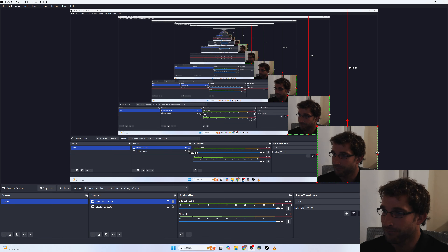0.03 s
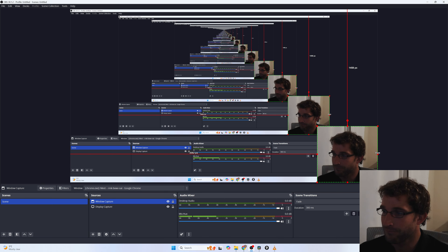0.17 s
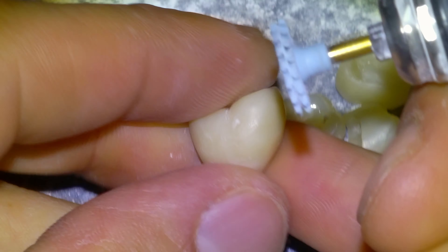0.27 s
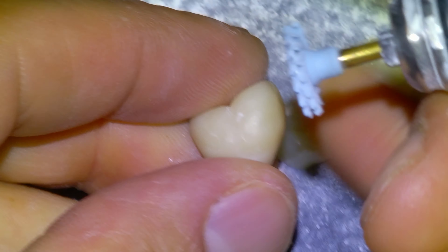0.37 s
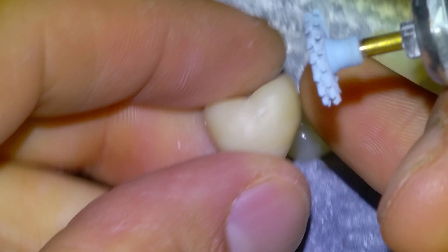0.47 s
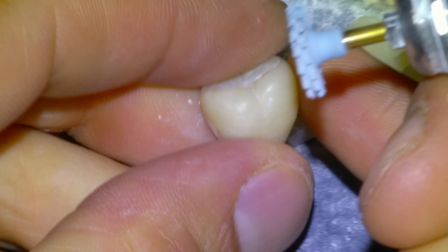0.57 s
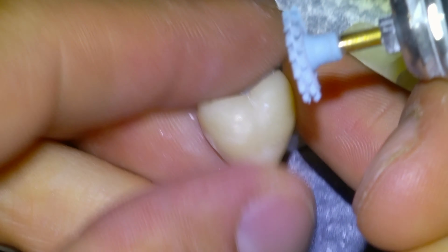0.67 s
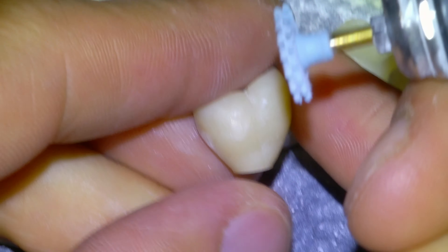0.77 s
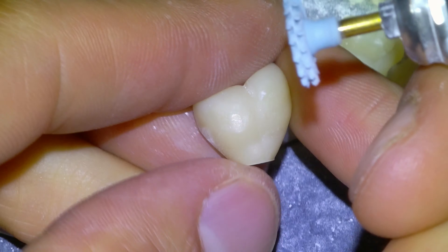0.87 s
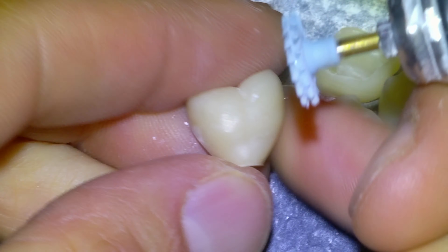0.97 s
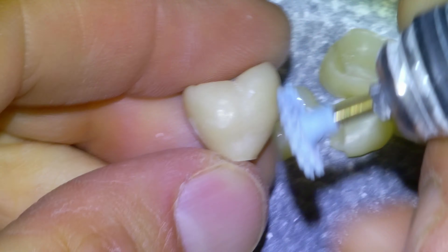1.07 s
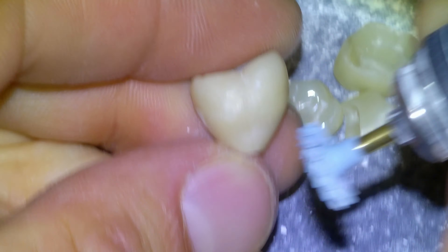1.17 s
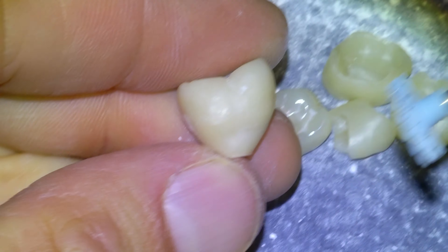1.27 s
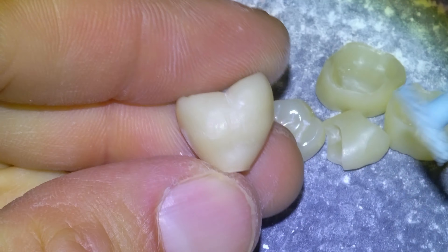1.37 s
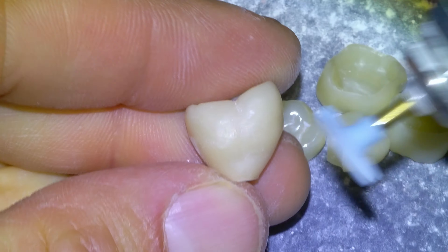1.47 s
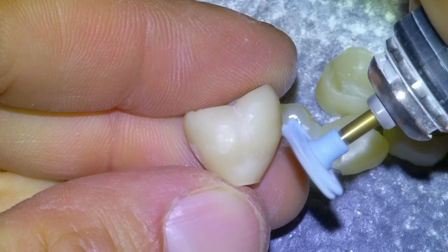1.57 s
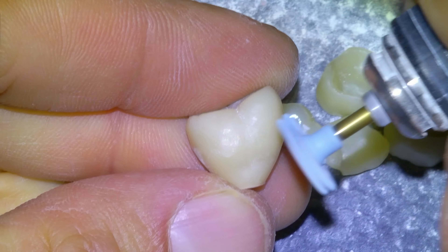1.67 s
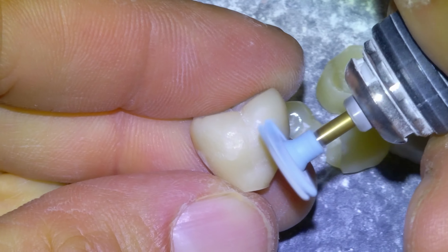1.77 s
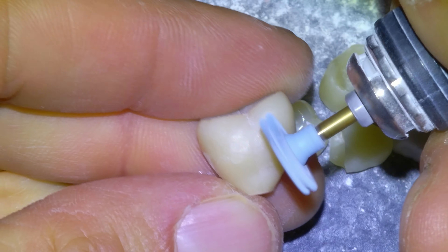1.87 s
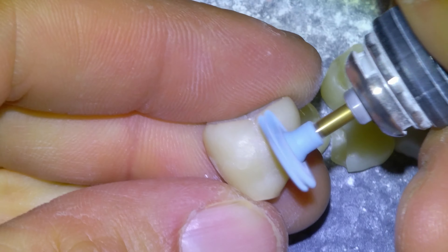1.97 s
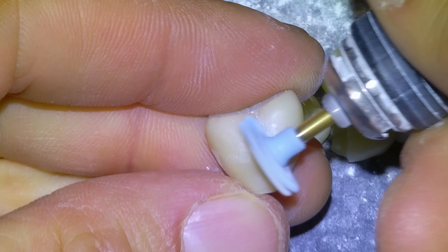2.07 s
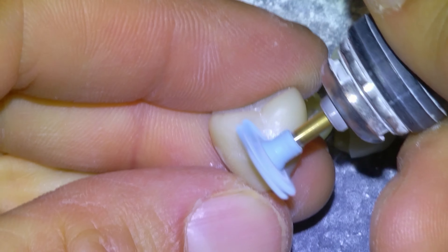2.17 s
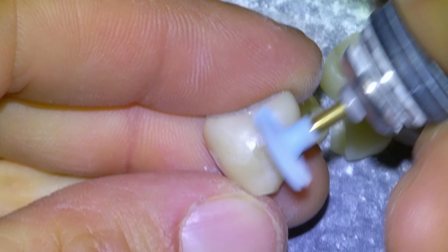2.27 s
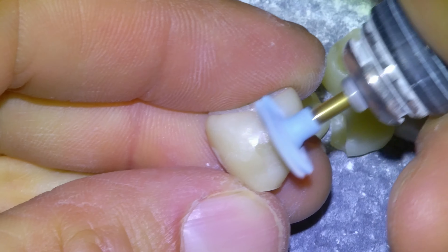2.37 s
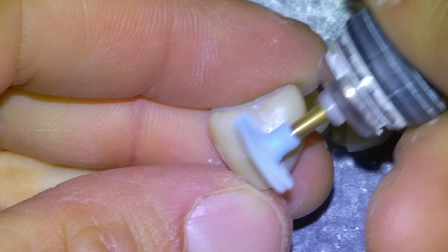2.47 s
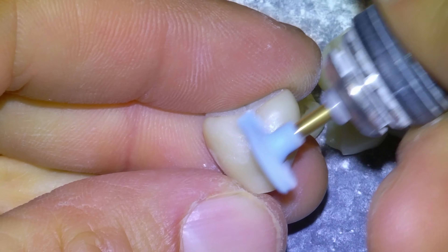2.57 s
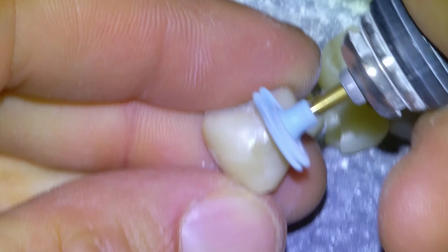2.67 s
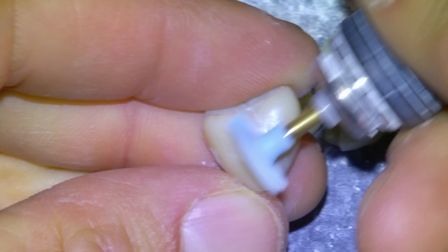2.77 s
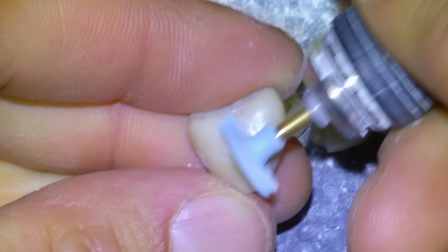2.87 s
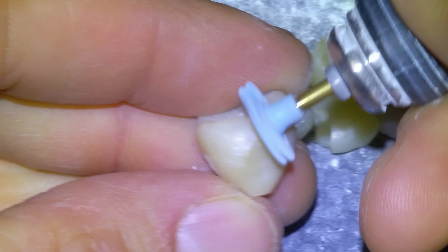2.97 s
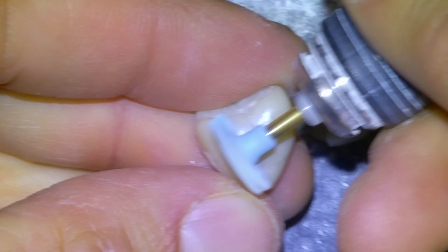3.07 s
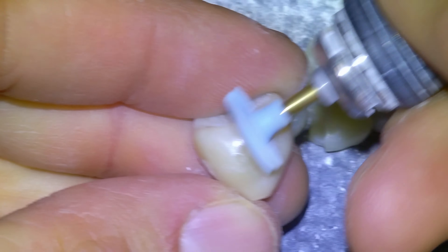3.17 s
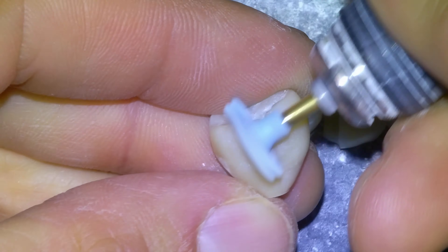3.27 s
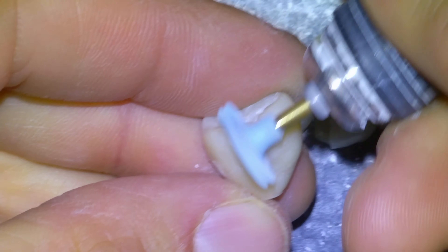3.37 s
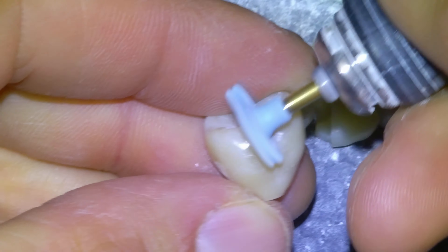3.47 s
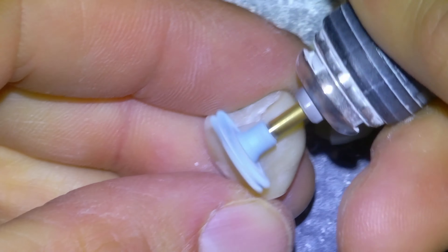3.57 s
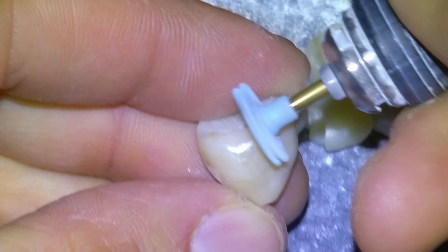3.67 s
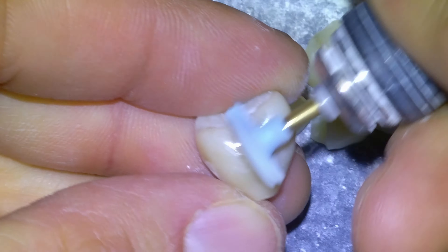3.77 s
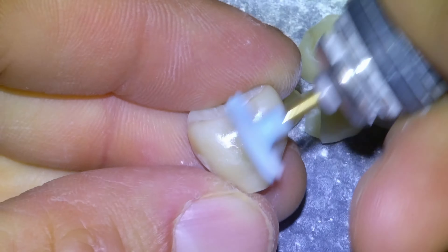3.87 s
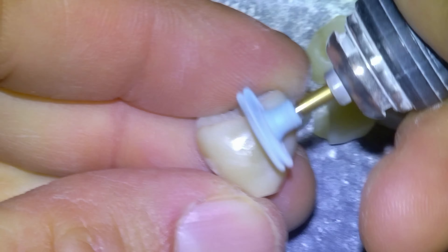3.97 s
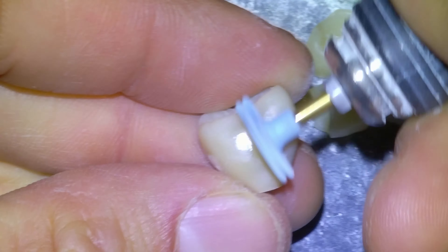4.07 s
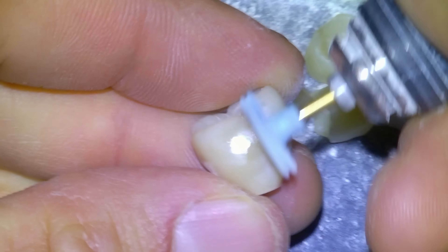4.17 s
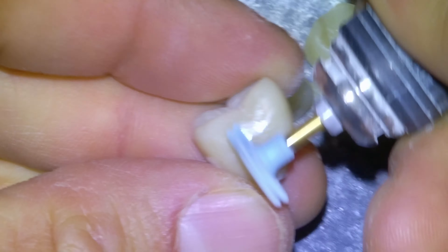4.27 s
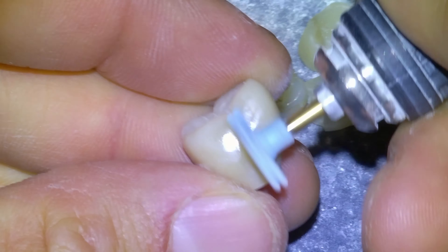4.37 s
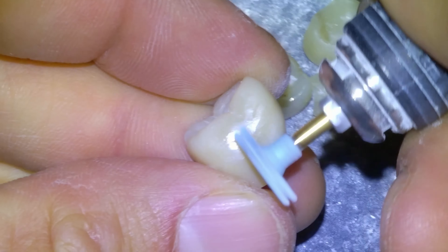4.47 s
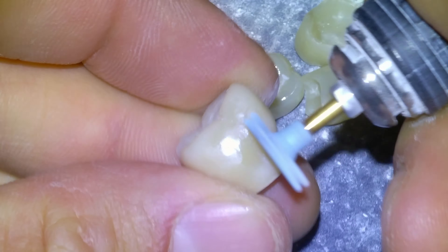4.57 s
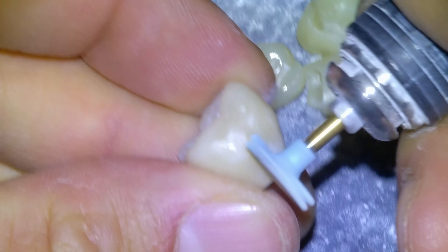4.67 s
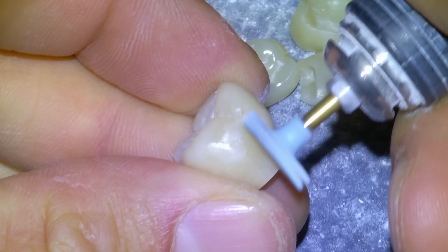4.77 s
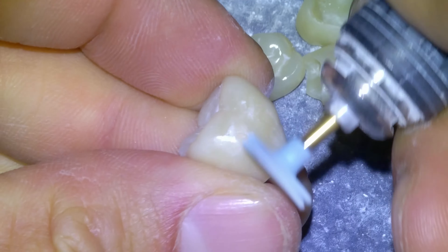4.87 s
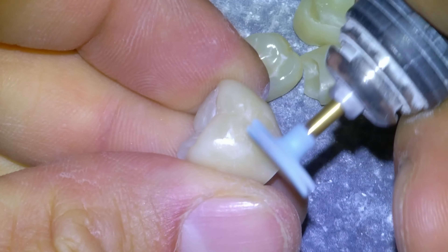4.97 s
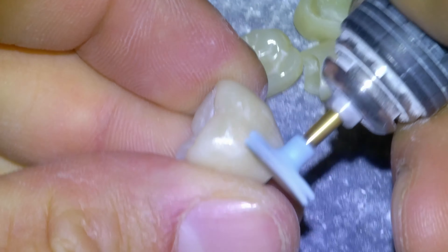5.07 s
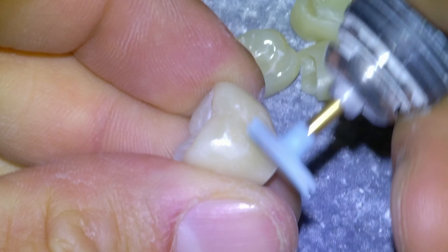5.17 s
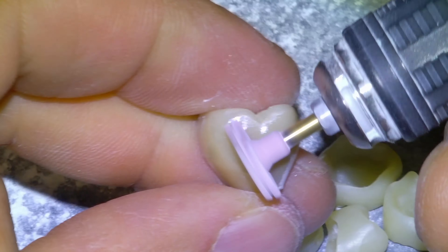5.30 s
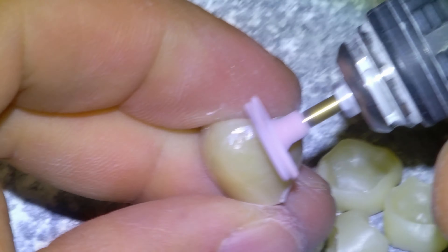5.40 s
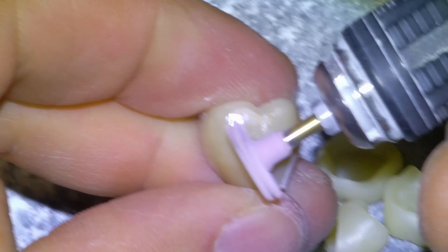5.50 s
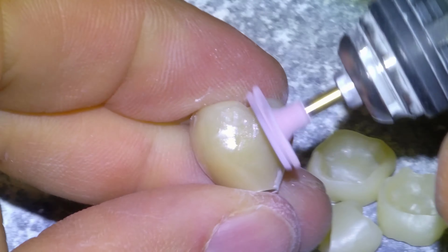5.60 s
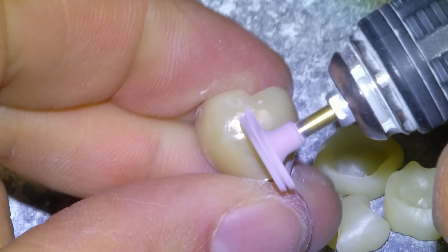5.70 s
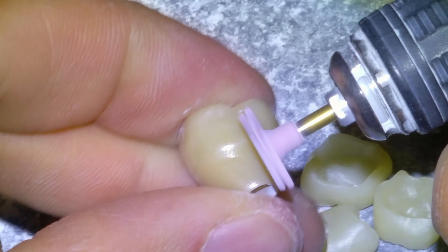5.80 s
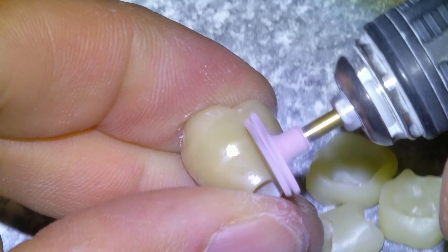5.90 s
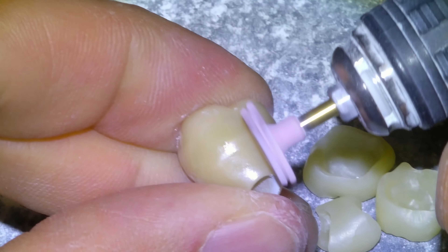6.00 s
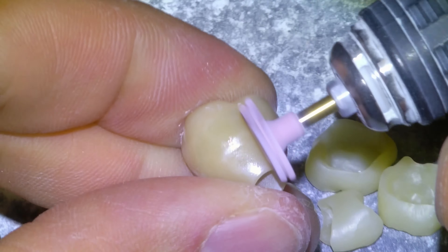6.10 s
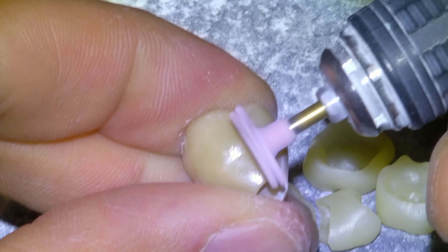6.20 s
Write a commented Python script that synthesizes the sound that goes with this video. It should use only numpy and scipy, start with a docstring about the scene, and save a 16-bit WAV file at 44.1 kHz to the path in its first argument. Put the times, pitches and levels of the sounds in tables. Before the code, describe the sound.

A dull low rumble lasts until 0.19 s and stops abruptly. Very quiet room noise follows, with tiny dry ticks near 0.36 and 0.96 s and a soft rustle of the gripping hand around 1.25 s. A low hum swells. At 1.34 s a tight double clack switches on a small dental micromotor; from 1.4 s it whirrs, shudders around 1.6 s and sweeps steeply upward with a rough squeal and shrieking bearing overtones, reaching speed by about 2 s. A piercing high whine, around six to seven kilohertz, then holds, wavering slightly in pitch and swelling unevenly as the wheel presses the crown, over mid-pitched rattle and airy hiss. Room hum fades by 2.9 s; thin whistles come and go and the brightness gradually dulls. At 5.3 s a finer wheel enters with a short scrape, then rubs more softly. The motor is still running when it ends around 6.2 s. Close and dry.

```python
"""Dental lab, one microphone close by; a faint workshop hum behind. It opens with a low rumble that cuts off;
after a short silence the scene changes to the lab. A micromotor is switched on with a knock, spins up to 600
turns/s and polishes a ceramic crown. Bearing tones locked to the shaft sweep through the handpiece resonances
and settle into a whine, over the rattle of shaft and rubber wheel (hits and noise through body modes) and
rolling hiss. Late on a finer wheel takes over with a short scrape and a softer rub."""
import sys
import numpy as np
from scipy import signal
from scipy.fft import rfft, irfft, next_fast_len
from scipy.io import wavfile
from scipy.ndimage import uniform_filter1d, map_coordinates

SR = 44100
rng = np.random.default_rng(int(sys.argv[2]) if len(sys.argv) > 2 else 0)


def inscribe(sig):
    """Save sig as 16-bit PCM at rate SR to the path in sys.argv[1].

    A 1-D sig is mono; a 2-D sig holds one channel per row.
    Samples are clipped to [-1, 1] before scaling.
    """
    pcm = np.round(np.clip(np.atleast_2d(sig).T, -1, 1) * 32767)
    wavfile.write(sys.argv[1], SR, pcm.astype(np.int16))


N = 275184
TIME = np.arange(N) / SR

# Workshop room noise level: t/s, level/dB
ROOM_LEVEL_DB = [(.235, -65.5), (.9, -64), (1.8, -52), (2.55, -53), (2.9, -78)]
# Room noise spectrum: f/Hz, relative density/dB
ROOM_SPECTRUM = [(50, -40), (80, -27), (105, -2), (200, -6.5), (350, 1), (600, -1), (1100, -2),
                 (1700, -2.5), (2300, -10), (2900, -17.5), (4500, -22.5), (8000, -21.5), (12000, -18.5),
                 (15500, -35)]
# Steady room tones: f/Hz, level over room noise/dB
ROOM_TONES = [(479, -10), (1367, -13), (1641, -5)]
# 320 Hz hum: t/s, level/dB
HUM_LEVEL_DB = [(.3, -87), (.52, -69), (.7, -76.5), (1.28, -55.5), (1.95, -48.5), (2.2, -52.5), (2.5, -53),
                (2.8, -84)]
# Opening rumble spectrum: f/Hz, relative density/dB
RUMBLE_SPECTRUM = [(12, -31), (20, -4), (97, -3.5), (217, -7), (387, -5.5), (940, -23), (1270, -20.5),
                   (1640, -24), (2100, -17.5), (3650, -31), (15000, -38)]
# Grip rustle spectrum: f/Hz, relative density/dB
RUSTLE_SPECTRUM = [(700, -30), (1800, -1), (3200, -4), (4600, -5), (5400, -22), (6500, -6), (9000, -36),
                   (14000, -45)]
# Small dry ticks: t/s, peak/dB
TICKS = [(0.364, -46), (0.963, -42)]
# Knocks of switch and handpiece: t/s, relative level/dB, ring time factor/1
KNOCKS = [(1.335, -32.5, 0.7), (1.342, -34.5, 0.78), (1.362, -44, 1.7)]
# Knock modes: f/Hz, relative level/dB, t60 before ring factor/s
KNOCK_MODES = [(555, 3, 0.17), (652, -8, 0.24), (1190, -9, 0.096), (1433, 5, 0.12), (1560, 14, 0.063),
               (2040, 12.5, 0.06), (2450, -18, 0.055), (4300, -1, 0.075), (7140, -12, .04)]
# Low shaft shudders: t/s, level/dB, Gaussian sigma/s, f/Hz
SHUDDERS = [(1.602, -40, .008, 690), (1.618, -37.5, 0.023, 580), (1.62, -38, 0.043, 1580),
            (2.415, -43.5, 0.061, 610), (2.625, -47, 0.07, 492)]
# Running speed, sagging and recovering under the hand: t/s, shaft speed/(turns/s)
RUNNING_SPEED = [(2.06, 598.4), (2.2, 604.3), (2.38, 605.5), (2.62, 598.9), (2.9, 596.6), (3.18, 596.8),
                 (3.5, 602.2), (3.67, 600.8), (3.85, 605.9), (4.15, 600.1), (4.66, 608.8), (5.02, 602.8),
                 (5.28, 599.8), (5.41, 591.3), (5.55, 599.8), (5.85, 608.2), (6.24, 608.8)]
# Sound radiated by the handpiece: f/Hz, gain/dB
HOUSING = [(250, -30), (600, -17), (1200, -13), (1800, -6), (2600, -14), (3700, -20), (5300, -20),
           (5900, -8), (6400, 0), (7400, -9), (9700, -10), (10500, -19), (11200, -27), (15500, -35)]
# Path from balls into housing: f/Hz, gain/dB
COUPLING = [(1500, -10), (3000, -5), (5000, -2), (8000, -1.5), (9500, -2.5), (10700, -7.5), (13000, -2),
            (15000, 1)]
# Rattle spectrum: f/Hz, relative density/dB
RATTLE_SPECTRUM = [(60, -80), (130, -35.5), (220, -25), (420, -24), (750, -13.5), (1180, -4.5),
                   (1600, -1.5), (2050, -1), (2400, -4), (3000, -8), (3700, -18), (5600, -23), (7300, -48)]
# Body resonances excited by the rattle: f/Hz, width/Hz, relative gain/dB
BODY_MODES = [(1777, 33, 2), (1895, 19, -0.5), (2040, 33, 0.5), (2186, 21, 1.5), (3170, 38, -22)]
# Bearing hiss spectrum: f/Hz, relative density/dB
HISS_SPECTRUM = [(3000, -25), (4500, -5.5), (5300, -11.5), (6000, 4), (6450, 2), (7100, -1), (8200, -2.5),
                 (9200, -8), (10200, -21), (11500, -33)]
# Fine rubbing hiss spectrum: f/Hz, relative density/dB
RUB_SPECTRUM = [(8000, -23), (10500, -4), (12000, -4.5), (14000, -6), (15700, -22)]
# Rotor tones: multiple of shaft rate/1, level before housing/dB
ROTOR = [(1, -31.5), (2, -34.5), (3, -37.5), (7, -35), (10, -41), (15, -57), (16, -40), (17, -39.5),
         (20, -60), (21, -53)]
# Bearing whistles: multiple of shaft rate/1, level before housing/dB, swell from/s, swell to/s, swell/dB
WHISTLES = [(3.38, -40, 2.9, 3.4, 3), (5.1, -39, 2, 5.28, 5), (5.92, -39, 5.55, 5.75, 9),
            (6.8, -39, 5.35, 5.85, 8), (7.86, -51, 4.1, 5.05, 19), (9.79, -44, 4.7, 5.28, 5),
            (11.03, -50, 5.29, 5.4, 13), (12.26, -45, 3.35, 3.75, 9), (12.67, -48, 5.3, 6.3, 6),
            (14, -46, 1.9, 5.28, 9), (15.3, -48, 4.9, 5.28, 6), (21.64, -48, 2.1, 3.9, 14),
            (22.46, -47, 2, 3.9, 11)]
# Higher ball-contact harmonics: multiple/1, lower sideband/dB, upper sideband/dB (relative)
BEARING_HARMONICS = [(3, -25.5, -30), (4, -26.5, -33), (5, -22, -28), (6, -27, -31), (7, -39, -39),
                     (8, -39, -40), (9, -44, -44), (10, -45, -46)]
# Bearing tones, swelling as the hand loads the wheel: t/s, lower level/dB, upper level/dB (relative)
WHINE_LEVELS_DB = [(1.93, -33.5, -40), (2.07, -23, -36), (2.18, -28.5, -46), (2.35, -42.5, -35.5),
                   (2.5, -29, -49), (2.7, -25.5, -35), (2.9, -36, -47), (3.0, -30.5, -50), (3.19, -28, -30),
                   (3.26, -44, -45), (3.36, -30.5, -39), (3.73, -27, -43), (3.96, -37, -39.5),
                   (4.14, -32.5, -32), (4.55, -36.5, -48), (4.68, -49, -33.5), (4.9, -39.5, -55),
                   (5.24, -37, -44), (5.4, -45, -36.5), (5.56, -25, -43), (5.68, -34.5, -34.5),
                   (5.9, -38, -43.5), (6.24, -28, -31.5)]

TOP_HZ = 15700
BALLS_PER_TURN, CAGE_PER_TURN = 5.513, 0.411  # ball contacts and cage turns per shaft turn
# Run-up: start, first acceleration, drag time constant, sharpness of levelling off
START_S, PULL_TURNS_PER_S2, DRAG_S, GOVERNOR_KNEE = 1.396, 1250, 1.55, 20
SEATED_PACE = 0.37  # share of full speed from which the balls roll firmly
RATTLE_DB, RATTLE_RISE_DB = -31, 15  # full-speed level; rise from rest
HISS_DB, HISS_SHARE = -39, 0.097  # full-speed level; share of whine swell in dB
RUB_DB = -58.8  # full-speed level before dulling
BRIGHT_SHARE, BRIGHT_WANDER_DB = 0.66, 4  # overtones: share of whine swell in dB; random drift
DULLING_DB_PER_S, DULLING_MID_S = 0.8, 3.1  # slope; time of zero offset
WHEEL_CHANGE_S, FINE_WHEEL_DB = 5.295, -3
BITE_DB, BITE_HZ, BITE_WIDTH_HZ, BITE_T60_S = -30, 6840, 460, 0.35  # finer wheel's first scrape
# Shaft whips at this speed and boosts the overtones
CRITICAL_TURNS_PER_S, CRITICAL_WIDTH_TURNS_PER_S, CRITICAL_DB = 246, 39, 4.5
SQUEAL_MULTIPLE, SQUEAL_WIDTH_TURNS_PER_S, SQUEAL_DB = 6.75, 19.3, -31.5
CHATTER_DB, CHATTER_KNOTS_PER_S = 1.7, 45  # grip-slip flicker of the bearing tones


def amp(db):
    """Decibels to gain."""
    return np.exp(np.asarray(db) * np.log(10) / 20)


def unit(x):
    """Scale to rms 1."""
    return x / np.sqrt(np.mean(x ** 2) + 1e-20)


def gain(points, hz):
    """Gain from (f/Hz, dB) points, interpolated on a log-frequency axis."""
    point_hz, db = np.transpose(points)
    return amp(np.interp(np.log(hz + 1), np.log(point_hz + 1), db))


def curves(rows):
    """One value per sample for each column after the time."""
    time_s, *columns = np.transpose(rows)
    return [np.interp(TIME, time_s, column) for column in columns]


def wobble(knots_per_s):
    """Smooth random curve through normal knots."""
    coarse_s = TIME[::16]
    knots = rng.standard_normal(int(TIME[-1] * knots_per_s) + 4)
    return np.interp(TIME, coarse_s, map_coordinates(knots, [coarse_s * knots_per_s]))


def filtered(x, response):
    """Apply a frequency response by zero-padded FFT."""
    size = next_fast_len(N + SR // 4)
    return irfft(rfft(x, size) * response(np.fft.rfftfreq(size, 1 / SR)), size)[:N]


def resonance(f, hz, width_hz):
    """Causal response of one damped mode, unity at its centre."""
    return 1j * f * width_hz / (hz * hz - f * f + 1j * f * width_hz)


def noise(spectrum):
    """Coloured noise of rms 1."""
    return unit(filtered(rng.standard_normal(N), lambda f: gain(spectrum, f)))


def tone(cycles, flutter_db, rough_rad):
    """Sine of rms about 1 with slow level flutter and fast phase jitter."""
    phase_rad = 2 * np.pi * cycles + rough_rad * wobble(130)
    return np.sqrt(2) * amp(flutter_db * wobble(11)) * np.sin(phase_rad)


def workshop():
    """A low rumble opens the sound and cuts off; after a short silence the scene changes to room noise, steady
    tones and a hum that swells and fades."""
    rumble = amp(-51.5) * noise(RUMBLE_SPECTRUM) * np.interp(TIME, [.186, .192], [1, 0])
    room = noise(ROOM_SPECTRUM)
    for hz, db in ROOM_TONES:
        room += amp(db) * tone(hz * TIME, flutter_db=1, rough_rad=.2)
    room *= amp(curves(ROOM_LEVEL_DB)[0])
    hum = amp(curves(HUM_LEVEL_DB)[0]) * tone(320 * TIME, flutter_db=1.5, rough_rad=0.23)
    drone = amp(-60.5) * tone(478 * TIME, flutter_db=1.5, rough_rad=.2)
    drone *= np.interp(TIME, [2.3, 2.8], [0, 1])
    return rumble + (room + hum + drone) * np.interp(TIME, [.234, .24], [0, 1])


def rustle():
    """Coloured noise swells and fades as the hand shifts its grip around the start."""
    level_db = np.interp(TIME, [.9, 1.1, 1.25, 1.45, 1.7], [-100, -73, -64.5, -82, -100])
    return amp(level_db) * noise(RUSTLE_SPECTRUM)


def ticks():
    """Tiny clicks: impulses through one broad, heavily damped mode."""
    out = np.zeros(N)
    response = lambda f: resonance(f, 700, 1000) * gain([(5000, 0), (15000, -7)], f)
    for time_s, peak_db in TICKS:
        click = filtered(signal.unit_impulse(N, round(time_s * SR)), response)
        out += amp(peak_db) * click / np.abs(click).max()
    return out


def knocks():
    """Each knock is a noisy clack plus a few exponentially damped modes."""
    out, t = np.zeros(N + SR), np.arange(SR // 3) / SR
    clack_band = signal.butter(3, [900, 3000], "bandpass", fs=SR)
    attack = np.sin(np.pi / 2 * np.minimum(t / .001, 1)) ** 2
    for time_s, db, ring in KNOCKS:
        modes = np.zeros(len(t))
        for hz, mode_db, t60_s in KNOCK_MODES:
            decay = amp(mode_db + rng.normal(0, 1.5) - 60 * t / (t60_s * ring))
            cycles = hz * rng.normal(1, 0.019) * t
            modes += decay * np.sin(2 * np.pi * cycles + rng.uniform(0, 2 * np.pi))
        clack = 1.6 * unit(signal.lfilter(*clack_band, rng.standard_normal(len(t))))
        clack *= amp(-60 * t / (.09 * ring))
        out[round(time_s * SR):][:len(t)] += amp(db) * attack * 0.4 * (modes + clack)
    return signal.sosfilt(signal.butter(2, 300, "highpass", fs=SR, output="sos"), out[:N])


def shudders():
    """The shaft shakes the handpiece: Gaussian bursts of resonant noise."""
    out = np.zeros(N)
    for time_s, db, sigma_s, hz in SHUDDERS:
        shake = unit(filtered(rng.standard_normal(N), lambda f: resonance(f, hz, 340) ** 2))
        out += amp(db) * np.exp(-.5 * ((TIME - time_s) / sigma_s) ** 2) * shake
    return out


def shaft_speed():
    """Turns/s: the motor pulls against growing drag until the governor holds the running speed."""
    since_s = np.maximum(TIME - START_S, 0)
    free = PULL_TURNS_PER_S2 * DRAG_S * (1 - np.exp(-since_s / DRAG_S))
    excess = (free / curves(RUNNING_SPEED)[0]) ** GOVERNOR_KNEE
    return free / (1 + excess) ** (1 / GOVERNOR_KNEE)


def seating(speed):
    """How firmly the balls roll: 0 at rest, 1 once the shaft is fast enough."""
    return np.clip(speed / speed.max() / SEATED_PACE, 0, 1)


def near_critical(speed, width):
    """Gaussian in speed: 1 at the critical speed, falling to 0 on both sides."""
    return np.exp(-.5 * ((speed - CRITICAL_TURNS_PER_S) / width) ** 2)


def dulling_db():
    """Treble offset that sinks steadily while the crown is polished."""
    return DULLING_DB_PER_S * (DULLING_MID_S - TIME)


def rattle(speed, level_db, hits_per_turn=2.1, smooth=1.77):
    """Irregular impacts of shaft and wheel plus smooth rubbing noise ring the body modes."""
    # The added 200 turns/s keeps some hits at low speed.
    hits = (rng.random(N) < hits_per_turn * (speed + 200) / SR) * rng.standard_normal(N)
    drive = (unit(hits) + smooth * rng.standard_normal(N)) * amp(0.43 * wobble(70))

    def body(f):
        modes = sum(amp(db) * resonance(f, hz, width_hz) for hz, width_hz, db in BODY_MODES)
        return gain(RATTLE_SPECTRUM, f) * (0.76 + modes)

    return amp(level_db) * unit(filtered(drive, body))


def faint_lines(turns, width, scatter_db):
    """Thicket of weak, fuzzy lines at shaft multiples plus or minus cage multiples."""
    steps, size = 128, 2 ** 19  # samples per turn; track length in samples
    multiples = (np.arange(1, 44)[:, None] + CAGE_PER_TURN * np.arange(-2, 3)).ravel()
    bins = np.round(multiples * size / steps).astype(int)
    levels = amp(scatter_db * rng.standard_normal(len(multiples)))
    comb = np.bincount(bins, levels, size // 2 + 1)
    blur = np.exp(-.5 * (np.arange(-300, 301) * steps / size / width) ** 2)
    comb = signal.fftconvolve(comb, blur, "same")
    track = irfft(comb * rfft(rng.standard_normal(size)))
    # Reading by shaft angle makes the lines follow the speed.
    return unit(map_coordinates(track, [turns * steps], order=3, mode="wrap"))


def hiss(turns, level_db, pulsing=0.43):
    """Rolling noise, pulsed twice per cage turn, rings in the handpiece."""
    lines = 2.4 * faint_lines(turns, width=.007, scatter_db=4.5)
    rolling = rng.standard_normal(N) * amp(2 * wobble(350)) + lines
    rolling *= 1 + pulsing * np.sin(4 * np.pi * CAGE_PER_TURN * turns)
    return amp(level_db) * unit(filtered(rolling, lambda f: gain(HISS_SPECTRUM, f)))


def whirr(turns):
    """Slow balls skid and whirr in the main resonance of the housing."""
    level_db = np.interp(TIME, [1.38, 1.425, 1.48, 1.55, 1.65, 1.72],
                         [-75, -50.5, -37.5, -33, -44, -45])
    skid = rng.standard_normal(N) * (1 + 0.26 * np.sin(4 * np.pi * CAGE_PER_TURN * turns))

    def housing(f):
        return resonance(f, 6530, 600) * resonance(f, 5300, 3600) * gain([(9000, 0), (10500, -18)], f)

    return amp(level_db) * unit(filtered(skid, housing))


def rubbing(speed):
    """High hiss of rubber on ceramic; the finer wheel bites with a scrape, then rubs more softly."""
    since_s = TIME - WHEEL_CHANGE_S
    changed = since_s > 0
    level_db = RUB_DB + dulling_db() + FINE_WHEEL_DB * changed + .7 * wobble(8)
    rub = amp(level_db) * seating(speed) ** 3 * noise(RUB_SPECTRUM)
    scrape_band = lambda f: resonance(f, BITE_HZ, BITE_WIDTH_HZ) ** 2
    scrape = unit(filtered(rng.standard_normal(N), scrape_band))
    return rub + changed * amp(BITE_DB - 60 * np.abs(since_s) / BITE_T60_S) * scrape


def shaft_tone(multiple, speed, turns, flutter_db, rough_rad):
    """Tone locked to the shaft, loud where it crosses a resonance of the housing."""
    hz = multiple * speed
    return gain(HOUSING, hz) * (hz < TOP_HZ) * tone(multiple * turns, flutter_db, rough_rad)


def squeal(speed, turns):
    """Short rising chirp as the shaft passes its critical speed."""
    level = amp(SQUEAL_DB) * near_critical(speed, SQUEAL_WIDTH_TURNS_PER_S)
    return level * tone(SQUEAL_MULTIPLE * turns, flutter_db=5, rough_rad=0.57)


def whistles(speed, turns):
    """Rotor tones flutter a little; thin whistles swell as the wheel is pressed at new angles."""
    out = np.zeros(N)
    for multiple, db in ROTOR:
        out += amp(db) * shaft_tone(round(multiple), speed, turns, flutter_db=1.5, rough_rad=0.18)
    for multiple, db, start_s, end_s, swell_db in WHISTLES:
        pressed = uniform_filter1d(1. * ((TIME > start_s) & (TIME < end_s)), size=2000)
        whistle = shaft_tone(multiple, speed, turns, flutter_db=4.0, rough_rad=0.15)
        out += amp(db + swell_db * pressed) * whistle
    return (speed / speed.max()) ** 3 * out


def overtones(speed, turns, bright_db, fade_db=-3):
    """Higher bearing harmonics shriek in the run-up; the highest calm most as the speed grows."""
    pace = speed / speed.max()
    loose = np.clip(1 - pace, 0, 1)  # slow balls run unevenly
    out = np.zeros(N)
    for k, *levels_db in BEARING_HARMONICS:
        strength = amp(fade_db * k * pace ** 2) * gain(COUPLING, k * BALLS_PER_TURN * speed)
        for side, db in zip((-1, 1), levels_db):
            multiple = k * BALLS_PER_TURN + side * CAGE_PER_TURN
            sideband = shaft_tone(multiple, speed, turns, flutter_db=2.5, rough_rad=0.5 + 1.1 * loose)
            out += amp(db) * strength * sideband
    # Ball load varies with shaft and cage rotation, adding sidebands.
    sway = 1 + .25 * np.sin(2 * np.pi * turns) + .25 * np.sin(8 * np.pi * CAGE_PER_TURN * turns)
    sway += .5 * loose * wobble(1500)
    boost_db = CRITICAL_DB * near_critical(speed, CRITICAL_WIDTH_TURNS_PER_S)
    return seating(speed) ** 1.9 * sway * amp(bright_db + boost_db) * out


def whine(speed, turns, lower_db, upper_db):
    """Second harmonic of the ball contact, split in two by the turning cage."""
    out = np.zeros(N)
    for side, db in ((-1, lower_db), (0.99, upper_db)):
        multiple = 2 * BALLS_PER_TURN + side * CAGE_PER_TURN
        # Levels hold after the housing at median speed.
        level = amp(db) / gain(HOUSING, multiple * np.median(speed))
        out += level * shaft_tone(multiple, speed, turns, flutter_db=1.0, rough_rad=0.22)
    return (speed / speed.max()) ** 2 * out


def scene():
    """Shaft speed drives the handpiece tones and noises; the load of the hand makes them swell."""
    background = workshop() + rustle() + ticks() + knocks() + shudders()

    speed = shaft_speed()
    turns, pace = np.cumsum(speed) / SR, speed / speed.max()
    lower_db, upper_db = curves(WHINE_LEVELS_DB)
    swell_db = pace ** 8 * (lower_db - np.median(lower_db[pace > .9]))

    rattle_db = RATTLE_DB - RATTLE_RISE_DB * (1 - pace) + 0.42 * wobble(7)
    hiss_db = HISS_DB + HISS_SHARE * swell_db + 0.72 * wobble(9)
    rolling = rattle(speed, rattle_db) + seating(speed) ** 2 * hiss(turns, hiss_db)
    rolling += whirr(turns) + rubbing(speed)

    bright_db = BRIGHT_SHARE * swell_db + pace ** 8 * (dulling_db() + BRIGHT_WANDER_DB * wobble(9))
    bearing = overtones(speed, turns, bright_db) + whine(speed, turns, lower_db, upper_db)
    # The wheel grips and slips, so the bearing tones flicker.
    chatter = amp(CHATTER_DB * wobble(CHATTER_KNOTS_PER_S))
    tones = chatter * bearing + whistles(speed, turns) + squeal(speed, turns)

    powered = np.interp(TIME, [1.345, 1.385], [0, 1])
    mono = background + powered * (rolling + tones)
    return np.array([mono, mono])


def record(dry):
    """Band limit: nothing passes at or above TOP_HZ."""
    return np.array([filtered(x, lambda f: f < TOP_HZ) for x in dry])


dry = scene()
out = record(dry)
inscribe(out)
```